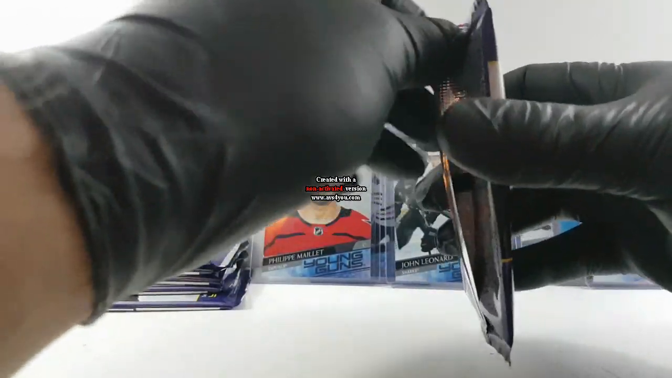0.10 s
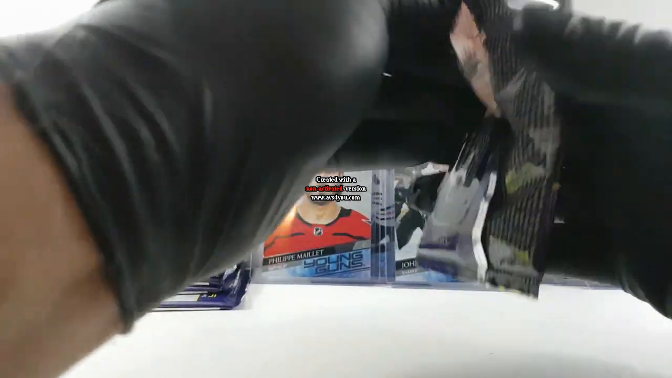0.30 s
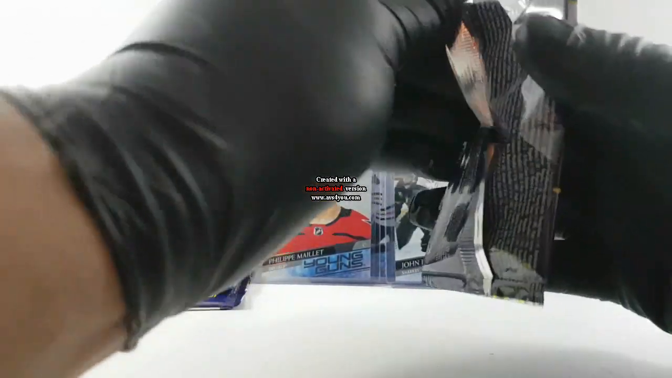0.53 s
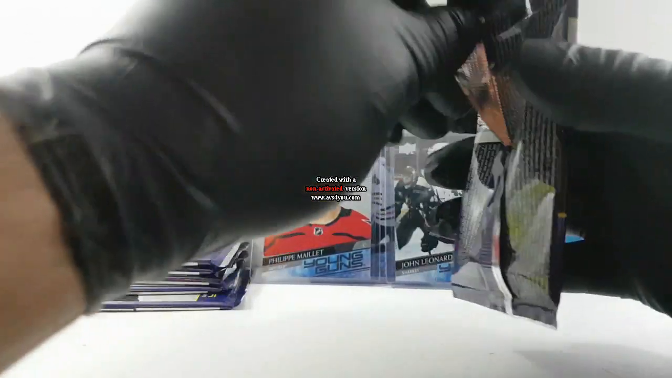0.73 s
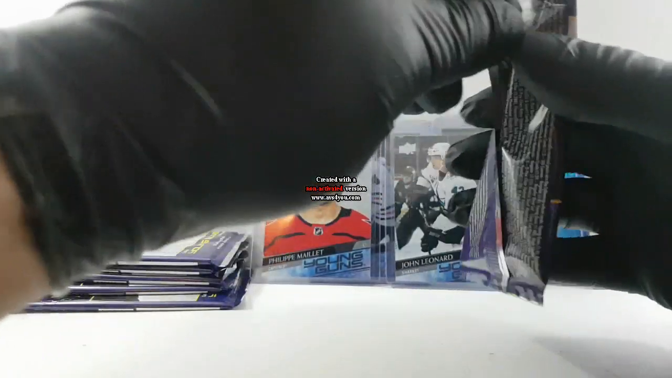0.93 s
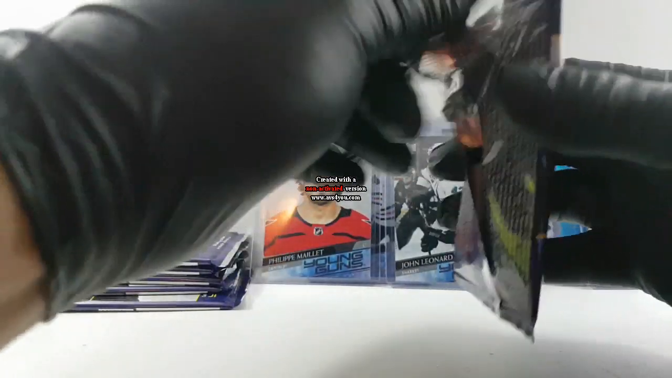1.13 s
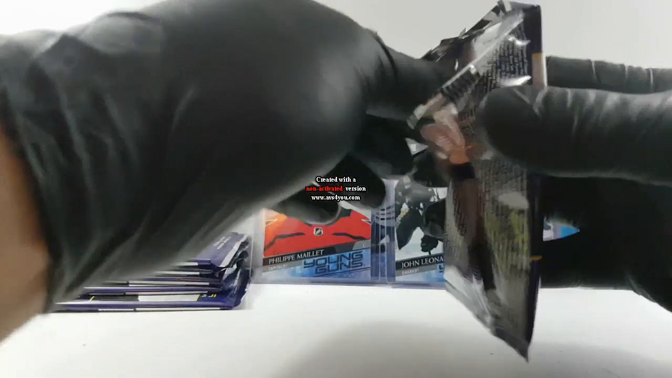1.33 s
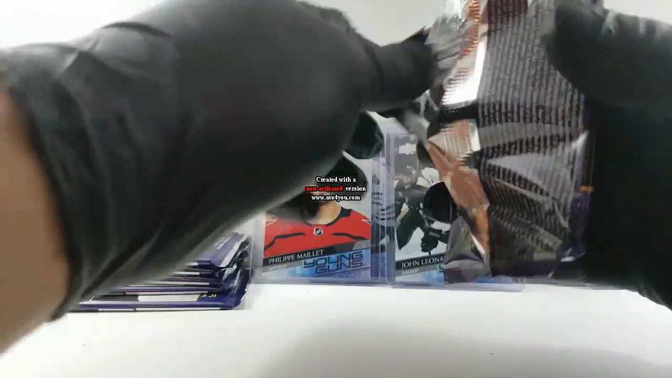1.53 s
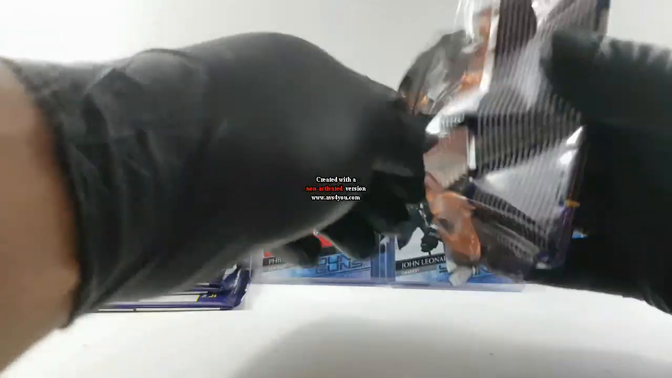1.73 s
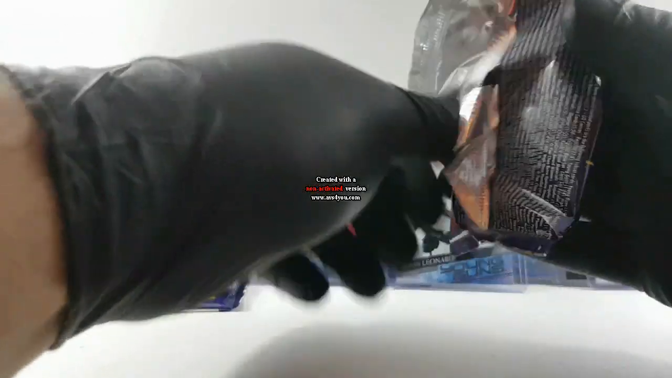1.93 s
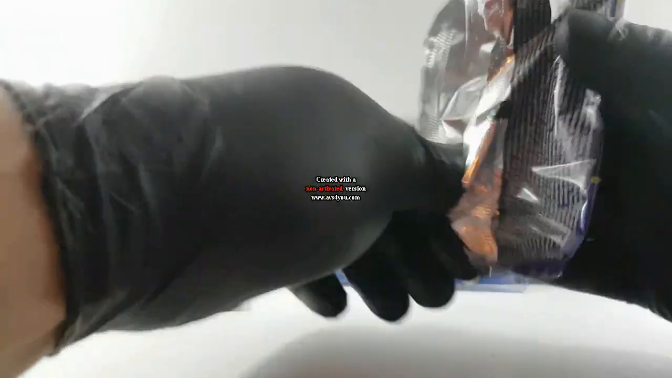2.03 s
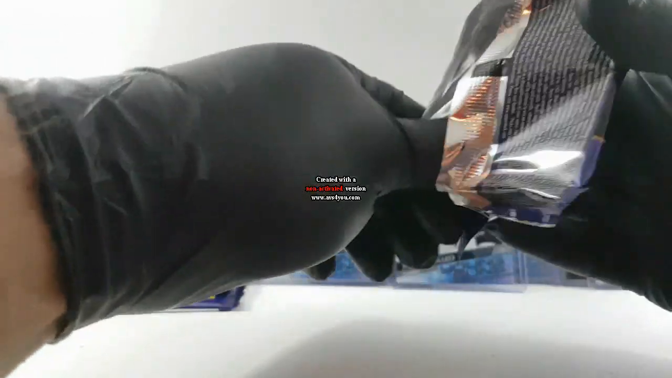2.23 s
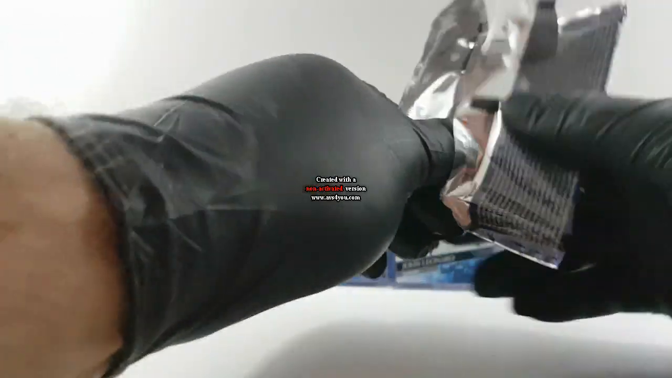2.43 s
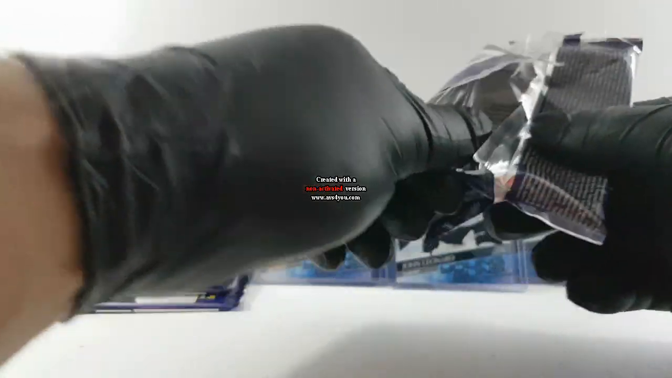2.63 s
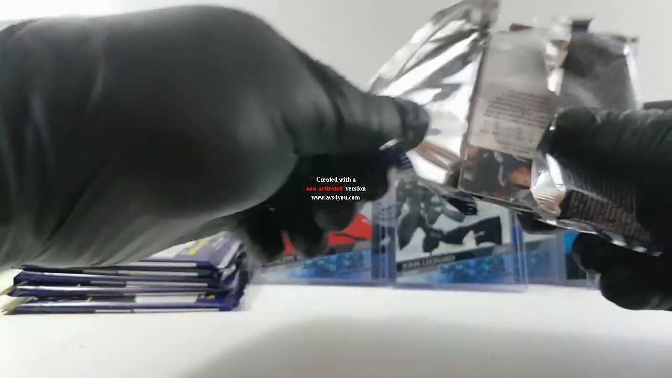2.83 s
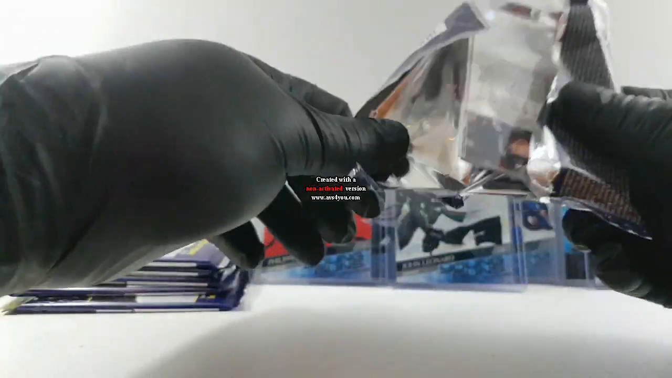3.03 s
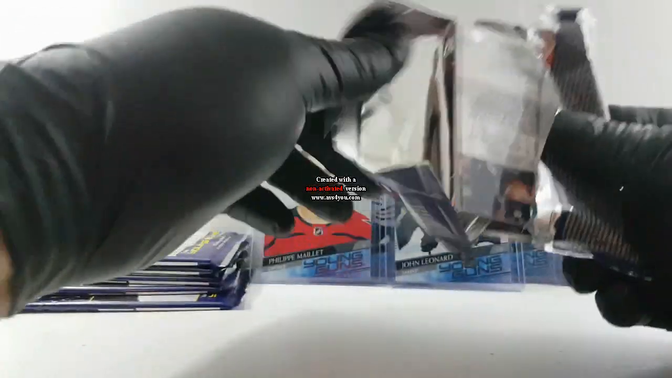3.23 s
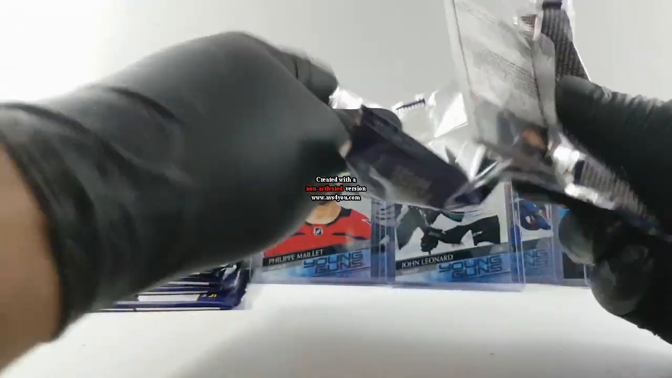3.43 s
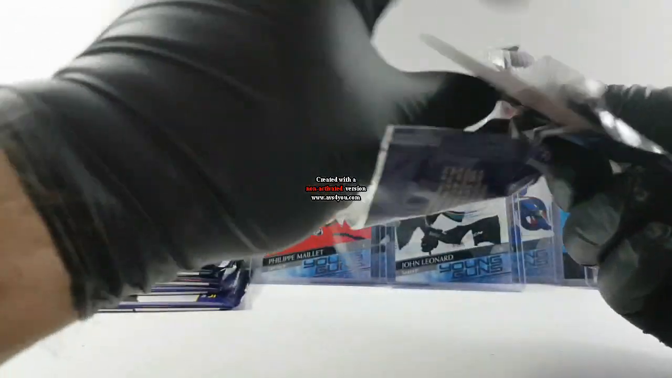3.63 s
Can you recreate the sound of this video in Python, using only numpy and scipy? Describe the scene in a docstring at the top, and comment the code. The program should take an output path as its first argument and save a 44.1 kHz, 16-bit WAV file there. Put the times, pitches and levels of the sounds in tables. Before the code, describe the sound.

Gloved fingers tear open a foil card pack: dense bright crackle in uneven bursts, panels popping, tiny rubber squeaks, strongest snaps early, midway and near the end, recorded close in a small, quiet room.

```python
"""Gloved hands pull open a foil card pack, close to a stereo microphone in a small room with a quiet tone.
Faint rustle starts it; soon creases snap in short bursts over swells of fine crackle, made of tiny clicks.
From 0.24 s flat panels pop with a low ring, and each snap leaves a small facet ringing briefly.
From 0.68 s a rubber fingertip now and then squeaks across the film, a gliding tone with overtones.
The hardest snaps come near 0.3, 1.4, 1.8, 2.8 and 3.4 s, and crackle and snaps thin out towards the end."""
import sys
import numpy as np
from scipy import signal
from scipy.fft import rfft, irfft, next_fast_len
from scipy.io import wavfile

SR = 44100
rng = np.random.default_rng(int(sys.argv[2]) if len(sys.argv) > 2 else 0)


def store_wav(level_fs):
    """Save 16-bit WAV to argv[1]."""
    pcm = np.round(np.clip(np.atleast_2d(level_fs), -1, 1) * 32767)
    wavfile.write(sys.argv[1], SR, pcm.T.astype(np.int16))


N = 163170  # length in samples

# Quiet sound of the room: pitch_hz, level_db (only the shape matters)
ROOM_TONE_COLOUR = [(20, 3), (100, -6), (500, -13), (2000, -31), (6000, -31), (16000, -27)]
# Glove squeaks: start_s, length_s, start_pitch_hz, end_pitch_hz, level_db, overtones_db (before roughness)
GLOVE_SQUEAKS = [(0.675, 0.014, 610, 736, -34.5, -18), (.692, 0.032, 1166, 1130, -39, -14),
                 (0.708, 0.037, 860, 1014, -32.5, -23), (1.12, 0.025, 513, 998, -25.5, -13),
                 (1.14, 0.035, 882, 715, -27.5, -15), (1.245, 0.026, 665, 876, -35, -20),
                 (2.338, 0.032, 1665, 1650, -25.5, -22), (3.112, 0.054, 427.5, 347, -36, 1.5)]
# Wrapper panels buckling: start_s (before POP_SHIFT_S), level_db (before POP_DB), pitch_hz
PANEL_POPS = [(0.239, -27, 1140), (0.311, -19.5, 810), (0.37, -25.5, 352), (0.372, -15, 1940),
              (0.61, -25, 607), (0.642, -18.5, 644), (0.774, -24, 950), (0.84, -18.5, 1360),
              (0.878, -20.5, 680), (0.933, -20, 760), (1.083, -17.5, 704), (1.13, -14, 860),
              (1.189, -24, 680), (1.3, -21.5, 760), (1.392, -16, 620), (1.408, -17, 650),
              (1.538, -30.5, 507), (1.676, -25.5, 467), (1.756, -19, 530), (1.951, -30, 706),
              (2.099, -17.5, 755), (2.117, -9, 780), (2.202, -24.5, 663), (2.303, -17.5, 1310),
              (2.566, -25.5, 674), (2.602, -18, 865), (2.603, -10.5, 2130), (2.748, -14.5, 674),
              (2.793, -13.5, 740), (2.927, -27, 355), (2.985, -30, 310), (3.015, -26, 244),
              (3.099, -21, 695), (3.165, -21, 283), (3.31, -24, 316), (3.341, -17, 587), (3.357, -21, 308),
              (3.623, -24.5, 730)]
# Faint rustle between crushes: time_s, level_db (before RUSTLE_DB), bass_share_db (its average is removed)
RUSTLE = [(0.0, -24.5, 6), (0.39, -99, 3), (0.45, -32, -31), (0.61, -23, 12), (1.01, -24.5, -1),
          (2.66, -28, 10), (3.32, -34.5, 10), (3.7, -34, -9)]
# Fingers crushing the foil: start_s, length_s, level_db,
# bass_share_db (below 1.2 kHz), middle_share_db (1.2-3.5 kHz), top_share_db (above 7.5 kHz)
FOIL_CRUSHES = [(0.075, 0.15, -34.5, -8, -8, 8), (0.207, 0.23, -28.5, -5, -4, 11.5),
                (0.286, 0.18, -21.5, -27, 0, 1), (0.481, 0.11, -29.5, 0.5, 0.5, 0),
                (0.566, 0.12, -30.5, 0.5, 5, -1), (0.809, 0.083, -27, -13, 1.5, 1.5),
                (0.891, 0.16, -20.5, -3.5, 0.5, 2.5), (1.055, 0.077, -23.5, -0.5, 4, -1.5),
                (1.129, 0.11, -28, 10, 8, 0.5), (1.205, 0.35, -28, -3, 2, -1.5),
                (1.401, 0.11, -15, 0.5, 2, 0.5), (1.54, 0.046, -32.5, 3, 6, -4),
                (1.617, 0.16, -29, 5.5, 3.5, -0.5), (1.736, 0.12, -21, -1, 6, -1.5),
                (1.871, 0.046, -23, -4.5, 7, -3), (1.945, 0.12, -35.5, 14, 11, -6),
                (2.08, 0.09, -17.5, -9, 5, -2), (2.272, 0.063, -31, -7, 12.5, -4),
                (2.323, 0.085, -17, -1, 1.5, -5.5), (2.452, 0.24, -38.5, 9, 10.5, -1),
                (2.582, 0.21, -24.5, -10, 9.5, -0.5), (2.697, 0.097, -23, 1, 11.5, 3),
                (2.868, 0.15, -33, 7, 8, -5), (2.914, .07, -21, -1, -3.5, -3),
                (2.964, 0.45, -35.5, 13.5, 6.5, -2.5), (3.338, .12, -33.5, 14, 13, -14),
                (3.452, 0.14, -40, 7, 6.5, -4)]
# Creases snapping: start_s, level_db (before SNAP_DB), middle_share_db (1.2-3.5 kHz, average removed)
CREASE_SNAPS = [(0.0599, -19, -7.5), (0.2195, -14.5, -29), (0.229, -21, -26), (0.2462, -25, -11),
                (0.2614, -23, -7), (0.272, -17.5, -6), (0.2947, -7.5, -15), (0.3118, -6, -10),
                (0.3282, -10, -1), (0.3396, -14, -12), (0.3547, -14, -3), (0.3741, -6.5, -3),
                (0.3866, -24, 4), (0.3973, -18, -8), (0.5861, -13, -10.5), (0.604, -14, -6),
                (0.6428, -14, -12), (0.6515, -15.5, 0), (0.7688, -16.5, -5.0), (0.7774, -10, -16),
                (0.8187, -11.5, -17), (0.83, -25, -8.0), (0.8449, -21, 2), (0.8658, -24, -6.5),
                (0.8809, -11.5, -8), (0.8857, -12.5, -8), (0.899, -20, -8.0), (0.9298, -14.0, -15),
                (0.9539, -11, 1), (0.9716, -11.5, -10.5), (0.9856, -9, -6), (1.023, -27, -11.0),
                (1.0836, -11.5, 0), (1.0991, -12.5, -5), (1.1342, -21.5, -2.5), (1.167, -11, 0),
                (1.1902, -9, -16), (1.231, -12.5, -23), (1.269, -14.5, -13), (1.3046, -15.5, -7),
                (1.3316, -18.5, -13), (1.3451, -16.5, -4), (1.3859, -17.5, 2.0), (1.3963, -10.5, -8),
                (1.4123, -7, -2), (1.4324, -4.5, -8), (1.471, -7.5, -11), (1.537, -20.0, 4.5),
                (1.574, -16, -12), (1.5964, -28, -14), (1.6144, -18.5, -4), (1.6338, -20, -8),
                (1.661, -17, -10), (1.6796, -17, -10), (1.6981, -18.5, -7.0), (1.7096, -18, -19.0),
                (1.7383, -16.5, -12), (1.7444, -18, -7.0), (1.761, -3.5, -10), (1.8067, -15.5, -12.5),
                (1.8262, -9.5, -12.5), (1.9077, -17.5, -6.5), (1.933, -15, -17), (1.9557, -13, -5.5),
                (1.974, -17.5, -3), (1.9942, -24.5, -10), (2.019, -23, -7.0), (2.0379, -12.0, -11),
                (2.051, -17.5, -12), (2.086, -18, -14), (2.1042, -8.5, -16), (2.1271, -13, -8),
                (2.1347, -21, -12), (2.2048, -18, -5.0), (2.2504, -33.5, 11), (2.2813, -23.0, 0),
                (2.2964, -32, 5), (2.306, -24, -4), (2.3467, -12.5, -16), (2.477, -29.5, -7),
                (2.5099, -9.5, -6), (2.5735, -18, -8), (2.6013, -16.5, -2), (2.606, -12, 0),
                (2.6854, -19.5, 10.5), (2.719, -21, -2.5), (2.7271, -9, -7), (2.742, -8.5, -17),
                (2.7639, -6.5, -18), (2.783, -8.5, -9), (2.7969, -6.5, -5), (2.9354, -17, -7),
                (2.9502, -14.0, -5), (2.989, -22, -11.0), (3.0172, -24.5, 5), (3.0324, -11.5, -16),
                (3.0597, -44, 3.0), (3.0886, -21, -4), (3.1035, -15, -3.0), (3.169, -13, -5),
                (3.2065, -15.5, -7), (3.2155, -16, -3.5), (3.2322, -21, -5.5), (3.2656, -17, -8),
                (3.3058, -15, -11.5), (3.3442, -10.5, -14), (3.3591, -7.5, -6.5), (3.37, -13.5, -10),
                (3.3839, -11.5, -12), (3.3978, -9.5, -10), (3.4107, -12, -7), (3.433, -29, -7),
                (3.4608, -21.5, -14.0), (3.5608, -17, -5.0), (3.6253, -24.5, 0), (3.6766, -18, -15)]
# Tone colour of foil and microphone: pitch_hz, level_db (per Hz)
FOIL_COLOUR = [(60, -22.5), (160, -9), (320, -7), (500, -9.5), (607, -1), (880, -6.5), (1010, -9),
               (1340, -6.5), (1860, -8.5), (2300, -10), (3300, -5), (5000, 1), (5900, 4.5), (6400, -5),
               (6800, -5.5), (8500, -12), (9800, -3.5), (11500, -3), (13000, -10.5), (16000, -2)]
# How alike left and right are: pitch_hz, likeness (0 to 1)
STEREO_LIKENESS = [(60, 0.48), (180, 0.93), (550, 1), (1650, 0.22), (5000, 0.25), (15000, 0.043)]
# Left level minus right level: pitch_hz, difference_db
LEFT_LOUDER = [(110, -1.5), (200, 2), (380, -4.5), (700, 0), (1290, 1), (2380, 5), (4400, 1), (8120, 8),
               (15000, -6)]
# How far the left wave leads the right: pitch_hz, lead_radians
LEFT_EARLIER = [(300, 0.48), (780, 0.53), (1290, 1.3), (1810, 0.6), (2500, -0.6), (4100, -1.56), (5500, -1),
                (6400, -0.1), (9000, -1.5), (11000, -4.5), (14000, 2)]
# Edges between neighbouring pitch bands: edge_hz
BAND_EDGES = [40, 250, 500, 800, 1200, 1700, 2400, 3500, 4500, 5600, 7500, 10000, 13000, 18000]
# Share each band follows: share_number (0 bass, 1 middle, 2 unchanged, 3 top)
BAND_SHARE = [0, 0, 0, 0, 1, 1, 1, 2, 2, 2, 3, 3, 3]

# A T60 is the time a sound takes to fade by 60 dB.
ROOM_TONE_DB = -60.5
ROOM_T60_S, ROOM_DB, WALL_CUT_HZ, ROOM_SPLIT_HZ = 0.13, -10, 7000, 600
SQUEAK_WOBBLE, SQUEAK_ROUGH_DB = 0.045, 7  # wobble is a fraction of the pitch
POP_DB, POP_SHIFT_S = 1.5, 0.00406  # every pop sounds this long after its listed time
POP_T60_CYCLES, POP_LONGEST_T60_S = 7.93, 0.022
OVERTONE_LOWEST, OVERTONE_RANGE, OVERTONE_DB = 1.4256, 0.1215, -11  # times the pop's pitch
FACET_LOWEST_HZ, FACET_HIGHEST_HZ, FACET_DB, FACET_T60_S = 1698, 6500, -7.5, 0.02
RUSTLE_DB, FLICKER_DB = -12, 2.5
CRUSH_LEAN, CRUSH_FLAT = 0.68, 0.8  # when the swell peaks, and how flat its top is
TICKS_PER_S, TICK_DB, TICK_SPREAD_DB, TICK_T60_S, TICK_COLOUR_DB = 200, -7, -0.5, 0.018, 3.5
SNAP_DB, SNAP_BASS_DB, SNAP_TOP_DB, SNAP_COLOUR_DB, CRACK_DB = -3.5, -3, -0.5, 3, 9
SNAP_RISE_S, SNAP_T60_S, SNAP_TAIL_DB, SNAP_TAIL_T60_S = 0.0004, 0.018, -8.5, 0.063
GRAINS_PER_S, GRAIN_SPREAD_DB, HISS_LEVEL = 11000, 2, 0.36
TOP_STOP_HZ, TOP_STOP_DB = 16432, 85


def amp(db):
    """Turn decibels into a plain multiplier."""
    return 10 ** (np.asarray(db) / 20)


def rms_one(x):
    """Scale a sound so that its average strength (rms) is 1."""
    return x / np.sqrt(np.mean(x ** 2) + 1e-20)


def at_hz(points, hz):
    """Read a (Hz, value) table between its points, on a log pitch axis."""
    f, v = np.transpose(points)
    return np.interp(np.log(hz + 1), np.log(f + 1), v)


def drift(rate_hz):
    """Smooth noise into a slow random wander of rms 1; a higher rate wanders faster."""
    r = np.exp(-2 * np.pi * rate_hz / SR)
    noise = rng.standard_normal(N + 8000)
    # drop the start, while the filter settles
    return rms_one(signal.lfilter([1], [1, -2 * r, r * r], noise)[8000:])


def add(out, start_s, piece):
    """Mix a piece in at a time in seconds, cutting whatever passes the end."""
    i = int(start_s * SR)
    out[..., i:i + piece.shape[-1]] += piece[..., :N - i]


def by_band(bass_db, middle_db, top_db):
    """Turn the three shares into a multiplier for every pitch band."""
    shares_db = np.array([bass_db, middle_db, 0 * middle_db, top_db])
    return amp(shares_db[BAND_SHARE])


def spread(pair, colour):
    """Colour two unrelated strands without ringing ahead, and blend them into left and right."""
    size = next_fast_len(N + 4096)
    hz = np.arange(size // 2 + 1) * SR / size
    # fold the log spectrum's transform onto positive times: a minimum-phase filter
    folded = irfft(np.log(amp(at_hz(colour, hz))), size)
    folded[1:size // 2] *= 2
    folded[size // 2 + 1:] = 0
    colouring = np.exp(rfft(folded))
    alike = np.clip(at_hz(STEREO_LIKENESS, hz), 0, 1)
    mid, side = rfft(pair, size) * colouring * np.sqrt([1 + alike, 1 - alike])
    # half of each left-right difference goes to either channel
    lead = amp(at_hz(LEFT_LOUDER, hz) / 2) * np.exp(0.5j * at_hz(LEFT_EARLIER, hz))
    return irfft([(mid + side) * lead, (mid - side) / lead], size)[:, :N]


def room_tone():
    """Steady noise, strongest in the bass, makes the quiet tone of the room."""
    noise = rng.standard_normal((2, N))
    return amp(ROOM_TONE_DB) * rms_one(spread(noise, ROOM_TONE_COLOUR))


def room(x):
    """Short dull tail of dying noise, alike in both channels in the bass, unalike above."""
    t = np.arange(SR // 4) / SR
    noise = rng.standard_normal((2, len(t)))
    low = signal.sosfilt(signal.butter(1, ROOM_SPLIT_HZ, fs=SR, output="sos"), noise)
    tail = noise - low + low[0]
    tail = tail * amp(-60 * t / ROOM_T60_S) * (t > 0.003)
    tail = signal.sosfilt(signal.butter(1, WALL_CUT_HZ, fs=SR, output="sos"), tail)
    tail = tail / np.sqrt(np.sum(tail ** 2, axis=1, keepdims=True))
    return amp(ROOM_DB) * signal.fftconvolve(x, tail, axes=1)[:, :N]


def squeaks():
    """Rubber sticks and slips: a short wavering glide that swells and stops."""
    out = np.zeros(N)
    wobble = drift(104)
    rough = amp(SQUEAK_ROUGH_DB * np.tanh(drift(160)))
    for start_s, length_s, start_hz, end_hz, level_db, overtones_db in GLOVE_SQUEAKS:
        u = np.linspace(0, 1, int(length_s * SR))
        glide_hz = start_hz + (end_hz - start_hz) * u
        hz = glide_hz * (1 + SQUEAK_WOBBLE * wobble[int(start_s * SR):][:len(u)])
        turn = 2 * np.pi * np.cumsum(hz) / SR
        overtones = np.sin(2 * turn) + 0.5 * np.sin(3 * turn)
        tone = np.sin(turn) + amp(overtones_db) * overtones
        swell = np.sin(np.pi * u ** 0.91) ** 0.63
        add(out, start_s, amp(level_db) * swell * tone)
    return out * rough


def pops():
    """Each buckling panel rings a few cycles at its pitch and one overtone that is no whole multiple."""
    out = np.zeros(N)
    t = np.arange(SR // 12) / SR
    for (start_s, level_db, hz), chance in zip(PANEL_POPS, rng.random((len(PANEL_POPS), 2))):
        t60_s = min(POP_T60_CYCLES / hz, POP_LONGEST_T60_S)
        envelope = amp(-60 * t / t60_s) * (1 - np.exp(-t * hz * 2))
        over_hz = hz * (OVERTONE_LOWEST + OVERTONE_RANGE * chance[0])
        overtone = amp(OVERTONE_DB) * np.sin(2 * np.pi * (over_hz * t + chance[1]))
        ring = np.sin(2 * np.pi * hz * t) + overtone
        add(out, start_s + POP_SHIFT_S, 2 * amp(level_db + POP_DB) * envelope * ring)
    return out


def facets():
    """The facet beside each snapping crease rings briefly at a chance pitch, a little to one side."""
    out = np.zeros((2, N))
    t = np.arange(SR // 30) / SR
    chances = rng.random((len(CREASE_SNAPS), 3))
    for (start_s, level_db, _), (pitch, side, turn) in zip(CREASE_SNAPS, chances):
        hz = FACET_LOWEST_HZ * (FACET_HIGHEST_HZ / FACET_LOWEST_HZ) ** pitch
        tone = np.sin(2 * np.pi * hz * t + [[0], [2 * turn]])
        ring = tone * amp(-60 * t / FACET_T60_S) * (1 - np.exp(-t * hz))
        add(out, start_s, amp(level_db + FACET_DB) * ring * [[0.5 + side], [1.5 - side]])
    return out


def rustle_and_crush_power():
    """Moving fingers swell the crackle: power per band of faint rustle plus each crush."""
    times_s, *columns = np.transpose(RUSTLE)
    level_db, bass_db = [np.interp(np.arange(N) / SR, times_s, c) for c in columns]
    flat = 0 * level_db
    power = (amp(level_db + RUSTLE_DB) * by_band(bass_db - bass_db.mean(), flat, flat)) ** 2
    for start_s, length_s, crush_db, *shares_db in FOIL_CRUSHES:
        u = np.linspace(0, 1, int(length_s * SR))
        swell = np.abs(np.sin(np.pi * u ** CRUSH_LEAN)) ** CRUSH_FLAT
        add(power, start_s, np.outer(amp(crush_db) * by_band(*shares_db), swell) ** 2)
    return power


def ticks_and_flicker():
    """Chance ticks, each with its own colour, die away over a flickering level in each band."""
    bands = len(BAND_SHARE)
    happens = rng.random(N) < TICKS_PER_S / SR
    ticks = happens * amp(TICK_DB + TICK_SPREAD_DB * np.minimum(rng.exponential(1, N), 2))
    ticks = ticks * amp(TICK_COLOUR_DB * rng.standard_normal((bands, N)))
    ticks = signal.lfilter([1], [1, -amp(-60 / (TICK_T60_S * SR))], ticks + 1e-18)
    shared = drift(23.3)
    flicker = amp([FLICKER_DB * (shared + 0.76 * drift(30)) for _ in range(bands)])
    return flicker * (0.5 + ticks)


def snaps_and_cracks():
    """A crease gives way: a fast burst with a tail, and a sharp crack a hair apart in the two strands."""
    bands = len(BAND_SHARE)
    t = np.arange(SR // 10) / SR
    fade = amp(-60 * t / SNAP_T60_S) + amp(SNAP_TAIL_DB - 60 * t / SNAP_TAIL_T60_S)
    shape = (1 - np.exp(-t / SNAP_RISE_S)) * fade
    snaps = np.array(CREASE_SNAPS)
    snaps[:, 2] -= snaps[:, 2].mean()
    colours = amp(SNAP_COLOUR_DB * rng.standard_normal((len(snaps), bands)))
    lags_s = SNAP_RISE_S * (1 + 2 * rng.random((len(snaps), 2)))
    power = np.zeros((bands, N))
    cracks = np.zeros((bands, 2, N))
    for (start_s, level_db, middle_db), colour, lag_s in zip(snaps, colours, lags_s):
        gains = amp(level_db + SNAP_DB) * by_band(SNAP_BASS_DB, middle_db, SNAP_TOP_DB) * colour
        add(power, start_s, np.outer(gains, shape) ** 2)
        moments = ((start_s + lag_s) * SR).astype(int)
        cracks[:, [0, 1], moments] = amp(CRACK_DB) * gains[:, None]
    return power, cracks


def foil():
    """Bending foil gives dense uneven micro-clicks, shaped band by band by rustle, crushes and snaps."""
    sizes = amp(GRAIN_SPREAD_DB * np.minimum(rng.exponential(1, N), 5))
    sizes = sizes * (rng.random(N) < GRAINS_PER_S / SR)
    clicks = rms_one(sizes) * rng.choice([-1, 1], (2, N))
    grains = clicks + HISS_LEVEL * rng.standard_normal((2, N))
    full_level = np.std(spread(grains, FOIL_COLOUR))
    snap_power, cracks = snaps_and_cracks()
    envelopes = np.sqrt(rustle_and_crush_power() * ticks_and_flicker() ** 2 + snap_power)
    total = np.zeros((2, N))
    for k, (envelope, crack) in enumerate(zip(envelopes, cracks)):
        band = signal.butter(2, BAND_EDGES[k:k + 2], "band", fs=SR, output="sos")
        # every other band is flipped in sign
        total += signal.sosfilt(band, grains * envelope + crack) * (-1) ** k
    return spread(total, FOIL_COLOUR) / full_level


def scene():
    """Foil, facets and pops sound in the room; the squeaks are too close and faint to wake it."""
    # pops differ slightly in level between left and right
    near = foil() + facets() + pops() * amp([[0.3], [-0.3]])
    return room_tone() + room(near) + squeaks() + near


def record(dry):
    """Peaks stop at full scale, then the top is cut steeply."""
    top_cut = signal.cheby2(16, TOP_STOP_DB, TOP_STOP_HZ, fs=SR, output="sos")
    return signal.sosfilt(top_cut, np.clip(dry, -1, 1))


dry = scene()
out = record(dry)
store_wav(out)
```